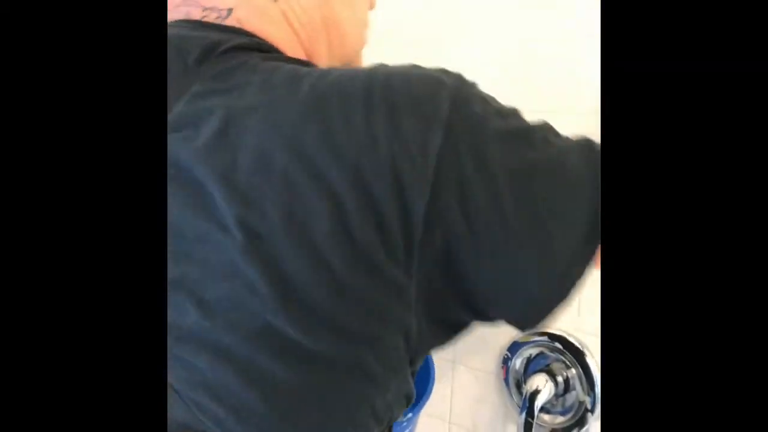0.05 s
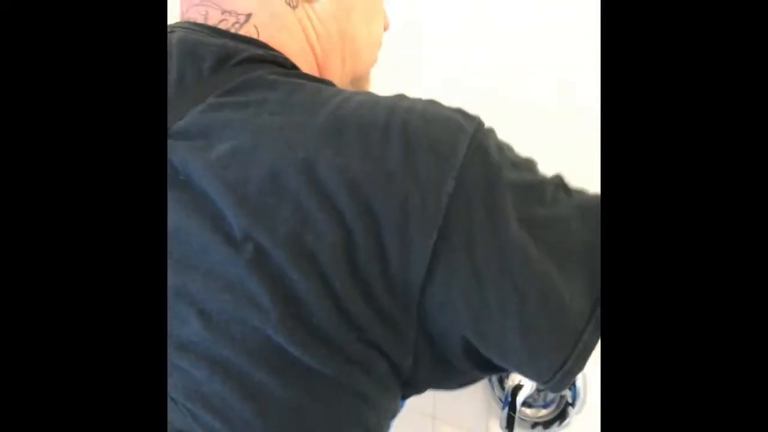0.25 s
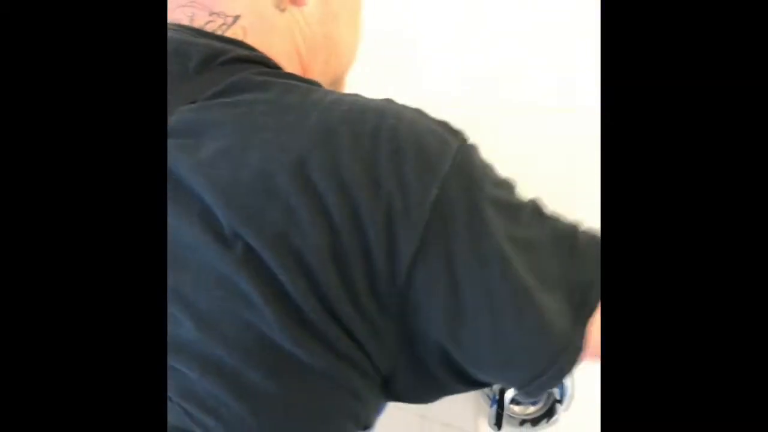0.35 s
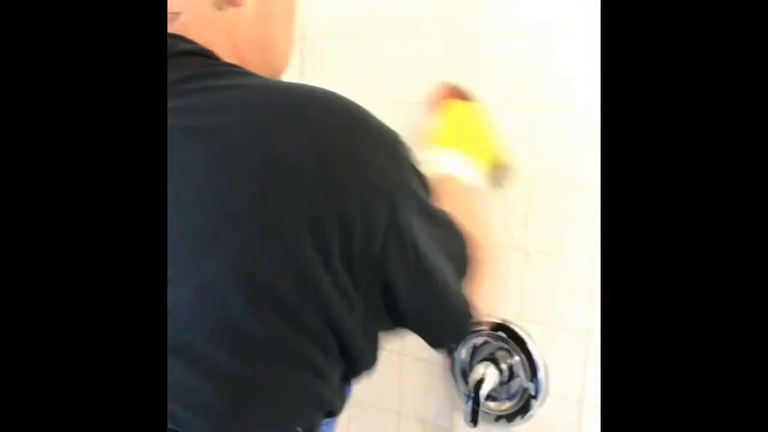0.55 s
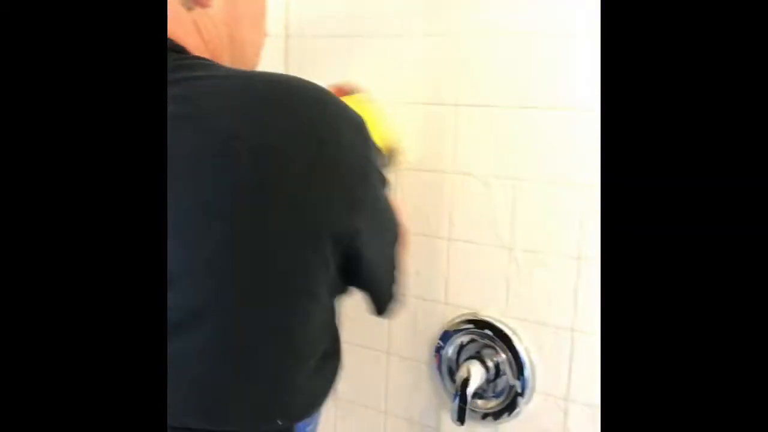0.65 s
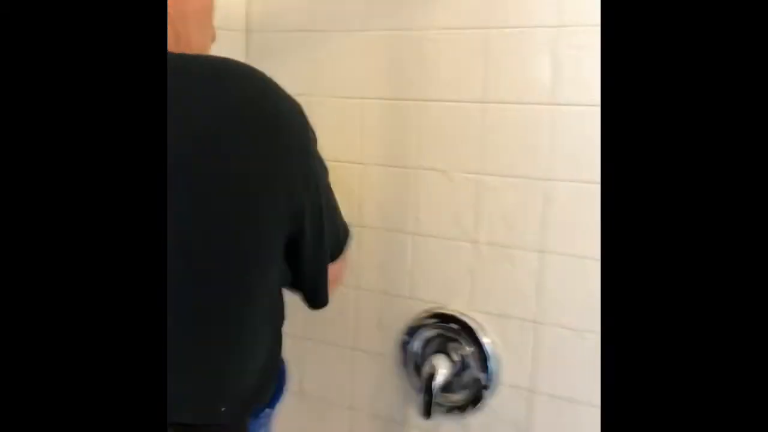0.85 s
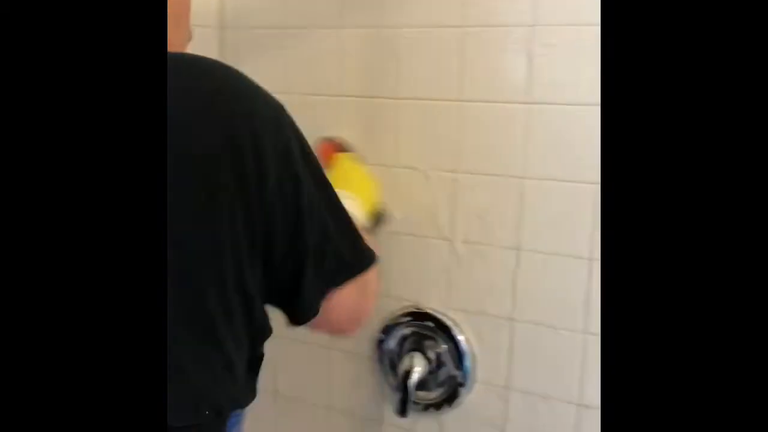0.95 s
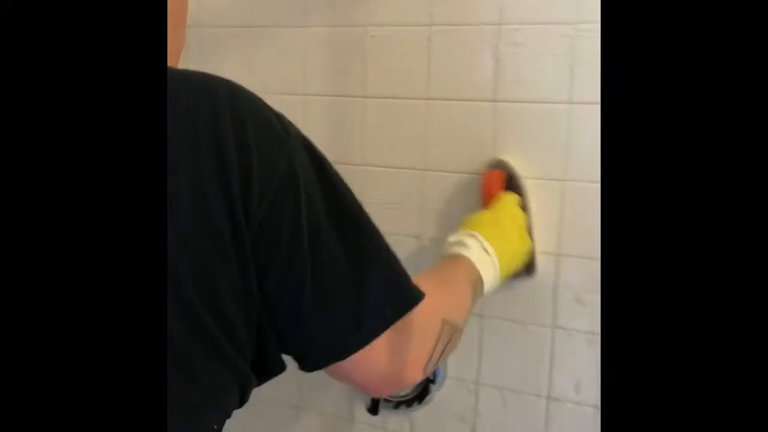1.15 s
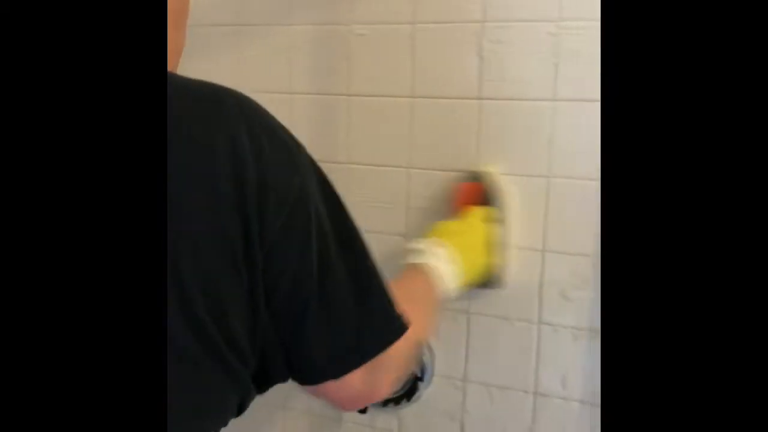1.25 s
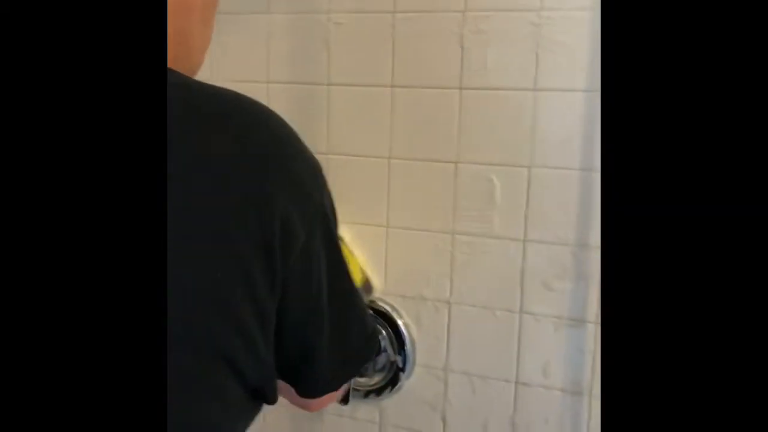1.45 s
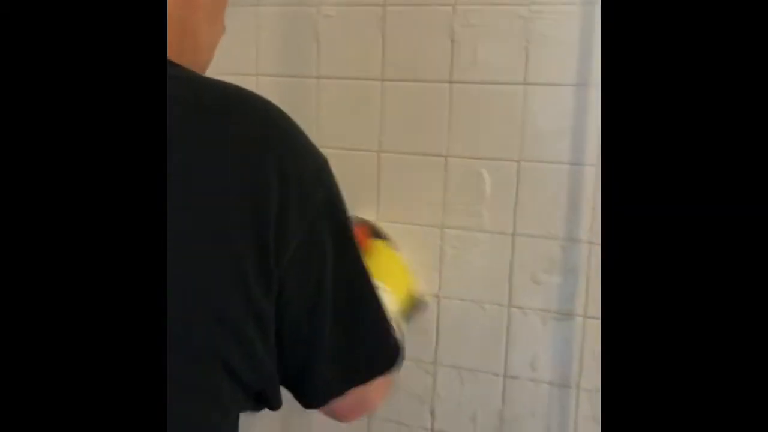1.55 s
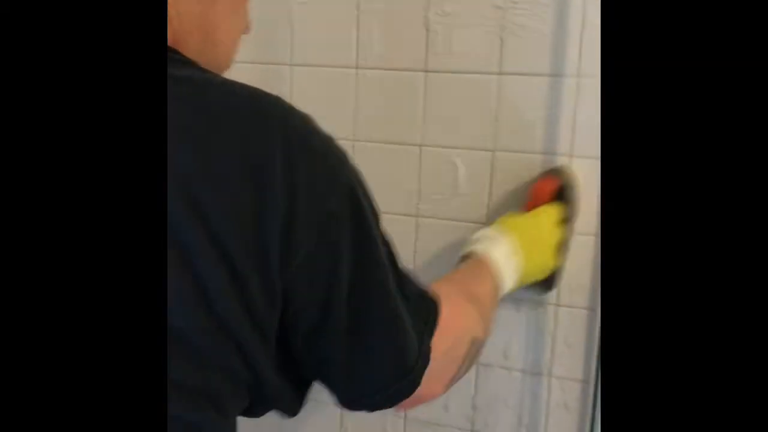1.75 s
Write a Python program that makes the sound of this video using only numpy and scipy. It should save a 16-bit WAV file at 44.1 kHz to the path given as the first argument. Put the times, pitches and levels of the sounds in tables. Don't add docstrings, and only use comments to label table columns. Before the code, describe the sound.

A stiff wet brush scrubs shower tiles with short, bright, scratchy strokes and a duller drag through the wall. At about 0.25 seconds a heavy thump bounces rapidly against the hollow stall, booming and ringing as the recording level dips. From about 0.45 seconds scrubbing returns in uneven strokes until the end, around 1.8 seconds, with soft wall knocks, small-room echo and faint low rumble.

```python
import sys
import numpy as np
from scipy import signal
from scipy.io import wavfile
from scipy.ndimage import uniform_filter1d, minimum_filter1d

SR = 44100
rng = np.random.default_rng(int(sys.argv[2]) if len(sys.argv) > 2 else 0)


def digitize_waveform(pressure):
    field = np.atleast_2d(pressure).T
    bounded = np.clip(field, -1, 1)
    quanta = np.round(bounded * 32767).astype(np.int16)
    wavfile.write(sys.argv[1], SR, quanta)


def voltage_ratio(level):
    return 10 ** (np.asarray(level, float) / 20)


N = 79380
T = np.arange(N) / SR

# f/Hz, level/dB per Hz
RUMBLE_COLOUR = [(25, -38), (40, -24), (56, 6), (80, -5.5), (115, -8), (200, -10.5), (350, -7)]
RUMBLE_DB = -56

# t/s, level/dB
THUMP_CONTACTS = [
    (0.2461, -29),
    (0.2471, -9),
    (0.2544, -10),
    (0.2581, -11.5),
    (.268, -11.5),
    (.279, -13),
    (0.281, -12.5),
    (.288, -14),
    (0.321, -12),
    (.355, -19),
]
# f/Hz, level/dB, time to fall 60 dB/s
STALL_TONES = [(69.6, -12, 0.12), (122.4, -5, 0.2), (159.4, -13, 0.46), (243, -8, 0.21), (284.3, -7, 0.25),
               (336.2, -10, 0.27), (390, -6, 0.16), (526, -16, 0.21), (614, -12, .15), (695.4, -5, .2),
               (733, -9, .2), (1036, -14.5, 0.32), (1418, -13, 0.2), (1498, -10.5, 0.094)]
# f/Hz, level/dB per Hz
BOOM_COLOUR = [(50, -18), (120, -4), (300, -6.5), (600, -4), (1000, -8), (1600, -13), (3000, -24),
               (6000, -59)]
# f/Hz, time to fall 60 dB/s
BOOM_FADE = [(60, 0.33), (250, 0.6), (700, 0.56), (1500, 0.5), (4000, 0.34)]
BOOM_DB, BOOM_RISE_S = -13, 0.0031
CRACK_DB, CRACK_T60_S = -40.5, 0.1
CONTACT_DB, CONTACT_HZ = 4.5, 625

# t/s, peak level/dB, f/Hz, time to fall 60 dB/s
PANEL_HUMS = [(.242, -12.5, 760, 0.13), (.242, -15, 670, .1), (0.27, -17.5, 203, 0.44),
              (.352, -15.5, 197, 0.19), (.414, -27, 200, 0.18), (.457, -36, 202, 0.13),
              (.507, -30, 200, 0.53), (.37, -30.5, 58.6, 0.61), (.43, -36, 58.4, 0.67),
              (.46, -38, 110, 0.32), (0.75, -46, 56, 0.44), (.66, -44.5, 55, 0.66), (1.21, -40, 55.5, .6),
              (1.285, -41, 57, 0.56), (1.74, -40, 64, .5), (1.77, -45, 120, 0.26), (0.15, -40, 160, .2),
              (1.15, -36.5, 271, 0.19), (.59, -36, 1150, 0.4), (.01, -36, 1000, 0.22)]
# t/s, peak level/dB, f/Hz, time to fall 60 dB/s
BRUSH_KNOCKS = [(0.546, -28, 492, 0.062), (.598, -31.5, 329, .15), (.678, -29, 544, 0.037),
                (.676, -38, 730, 0.056), (0.976, -36.5, 109, .15), (1.008, -32, 115, 0.16),
                (1.039, -32, 105, 0.31), (1.07, -36.5, 548, 0.084), (1.095, -31.5, 111, 0.13),
                (1.151, -38, 490, .1), (1.165, -41, 860, 0.14), (1.213, -31.5, 199, 0.095),
                (1.234, -33, 119, 0.068), (1.418, -34, 562.5, 0.3), (1.465, -41, 579, 0.32),
                (1.425, -33.5, 328, 0.15), (1.586, -37, 222, .1), (1.715, -42, 1130, .08),
                (1.772, -36, 726, 0.084), (1.773, -33.5, 170, 0.13), (.11, -35, 294, 0.084),
                (0.028, -38.5, 119, 0.29)]
KNOCK_PUSH_S = 0.0091

# start t/s, length/s, bristle hiss level/dB, wall drag level/dB
BRUSH_STROKES = [(0.0, 0.048, -47, -39.5), (0.044, 0.08, -42, -38), (0.159, 0.04, -46, -39),
                 (0.24, 0.028, -57, -59), (0.42, 0.063, -63, -49.5), (.47, 0.065, -44.5, -45),
                 (0.532, 0.079, -41.5, -41.5), (0.629, 0.055, -43, -41.5), (0.71, .04, -42, -41.5),
                 (0.789, 0.11, -45, -46), (0.981, 0.084, -49, -48), (1.047, 0.1, -51, -44),
                 (1.131, 0.032, -50, -37.5), (1.166, 0.056, -42.5, -43.5), (1.192, 0.023, -43.5, -40),
                 (1.336, 0.037, -49, -47), (1.405, 0.048, -42.5, -43), (1.458, 0.12, -49.5, -54),
                 (1.575, 0.11, -51.5, -50), (1.697, 0.035, -43.5, -40), (1.759, 0.055, -42.5, -41)]
ATTACK_S, RELEASE_DB_PER_S = 0.012, 222
REST_HISS_DB, REST_DRAG_DB = -55.5, -46
FLICKS_PER_S, FLICK_SPREAD_DB = 9000, 2.5
# f/Hz, level/dB per Hz
HISS_COLOUR = [(1500, -19), (3000, 4.5), (5000, -1.5), (7500, -3), (9300, -0.5), (10500, -5.5), (12000, -2),
               (15500, -1)]
# f/Hz, level/dB per Hz
DRAG_COLOUR = [(120, -2), (250, -0.5), (550, -0.5), (750, 0.5), (1150, 0), (2200, -2.5), (4000, -9.5),
               (7000, -12.5)]

ROOM_T60_S, WALL_CUT_HZ, ROOM_DB = 0.38, 7000, -18
DUCK_FROM_DB, DUCK_SHARE = -22, 0.63
DUCK_HOLD_S, DUCK_ATTACK_S, DUCK_BACK_DB_PER_S = 0.17, 0.14, 300
MIC_LOW_HZ, MIC_TOP_HZ = 47, 15720


def rms_one(x):
    return x / np.sqrt(np.mean(x ** 2) + 1e-20)


def at_hz(points, hz):
    known_hz, values = np.array(points)[:, 0], np.array(points)[:, 1]
    return np.interp(np.log(hz), np.log(known_hz), values)


def drift(rate):
    step = 40
    r = np.exp(-2 * step * np.pi * rate / SR)
    noise = rng.standard_normal(N // step + 2002)
    slow = signal.lfilter([1], [1, -2 * r, r * r], noise)[2000:]
    return np.interp(np.arange(N) / step, np.arange(len(slow)), rms_one(slow))


def ring(clicks, hz, t60):
    r = voltage_ratio(-60 / (t60 * SR))
    w = 2 * np.pi * hz / SR
    return signal.lfilter([0, np.sin(w)], [1, -2 * r * np.cos(w), r * r], clicks + 1e-18)


def coloured(sources, spectrum, patchy_db, patch_rate, t60s=None):
    edges = np.geomspace(spectrum[0][0] / 1.3, min(spectrum[-1][0] * 1.15, 17000), 20)
    since = np.maximum(T - THUMP_CONTACTS[0][0], 0)
    out, steady = np.zeros(N), np.zeros(N)
    for k, (low, high) in enumerate(zip(edges, edges[1:])):
        hz = np.sqrt(low * high)
        band_filter = signal.butter(2, [low, high], "band", fs=SR, output="sos")
        band = signal.sosfilt(band_filter, sources[k % 2])
        band = band * voltage_ratio(at_hz(spectrum, hz) + patchy_db * drift(patch_rate))
        steady += band
        if t60s is not None:
            band = band * voltage_ratio(-60 * since / at_hz(t60s, hz))
        out += band
    return out / np.sqrt(np.mean(steady ** 2))


def rumble():
    noise = rng.standard_normal((2, N))
    return voltage_ratio(RUMBLE_DB) * coloured(noise, RUMBLE_COLOUR, patchy_db=5.7, patch_rate=4.3)


def stall_echo(x):
    out, dull = np.zeros(N), np.exp(-2 * np.pi * WALL_CUT_HZ / SR)
    lags = (rng.uniform(0.008, 0.03, size=10) * SR).astype(int)
    for k, lag in enumerate(lags):
        loop, state = x.copy(), [0.]
        gain = voltage_ratio(-60 * lag / SR / ROOM_T60_S)
        for i in range(lag, N, lag):
            back, state = signal.lfilter([gain * (1 - dull)], [1, -dull], loop[i - lag:i], zi=state)
            loop[i:i + lag] += back[:N - i]
        out += (loop - x) * (-1) ** k
    return out


def thump():
    s, db = np.transpose(THUMP_CONTACTS)
    at = (s * SR).astype(int)
    chance_db = rng.normal(0, 4, (len(s), len(STALL_TONES)))
    signs = rng.choice([-1, 1], chance_db.shape)
    out = np.zeros(N)
    for k, (hz, level_db, t60) in enumerate(STALL_TONES):
        clicks = np.zeros(N)
        clicks[at] = signs[:, k] * voltage_ratio(db + level_db - 8 + chance_db[:, k])
        out += ring(clicks, hz, t60)

    clicks = np.zeros(N)
    clicks[at] = signs[:, 0] * voltage_ratio(db + CONTACT_DB)
    out += ring(clicks, CONTACT_HZ, 2.3 / CONTACT_HZ)

    since = np.maximum(T - s[0], 0)
    rise = 1 - np.exp(-since / BOOM_RISE_S)
    noise = rng.standard_normal((2, N))
    boom = voltage_ratio(BOOM_DB) * coloured(noise, BOOM_COLOUR, patchy_db=-0.5, patch_rate=16, t60s=BOOM_FADE)
    bright = signal.lfilter([1, -0.8], [1], rng.standard_normal(N))
    crack = voltage_ratio(CRACK_DB - 60 * since / CRACK_T60_S) * bright
    return out + rise * (boom + crack)


def knocks():
    events = [*BRUSH_KNOCKS, *PANEL_HUMS]
    out, size = np.zeros(N), int(KNOCK_PUSH_S * SR)
    for s, db, hz, t60 in events:
        shape = rng.standard_normal(size) * np.hanning(size)
        tuned = abs(np.sum(shape * np.exp(-2j * np.pi * hz * np.arange(size) / SR)))
        strength = tuned + 0.3 * np.sqrt(np.sum(shape ** 2))
        start = int(s * SR)
        push = np.zeros(N + size)
        push[start:start + size] = voltage_ratio(db) * shape / strength
        out += ring(push[:N], hz, t60)
    return signal.sosfilt(signal.butter(2, 2000, fs=SR, output="sos"), out)


def pressure(column, rest_db):
    power = voltage_ratio(2 * rest_db) * np.ones(N)
    for row in BRUSH_STROKES:
        start, length = row[0], row[1]
        rise = np.clip((T - start) / ATTACK_S, 0, 1) ** 2
        fall_db = RELEASE_DB_PER_S * np.maximum(T - start - length, 0)
        power += rise * voltage_ratio(2 * (row[column] - fall_db))
    return np.sqrt(power)


def brush():
    sizes = voltage_ratio(FLICK_SPREAD_DB * np.minimum(rng.exponential(1, (4, N)), 5))
    signs = rng.choice([-1, 1], (4, N))
    flicks = sizes * signs * (rng.random((4, N)) < FLICKS_PER_S / SR)
    flutter = voltage_ratio(0.75 * drift(20))
    hiss = coloured(flicks[:2], HISS_COLOUR, patchy_db=0.3, patch_rate=15)
    drag = coloured(flicks[2:], DRAG_COLOUR, patchy_db=2.0, patch_rate=25.5)
    hiss = hiss * pressure(column=2, rest_db=REST_HISS_DB)
    drag = drag * pressure(column=3, rest_db=REST_DRAG_DB)
    return flutter * (hiss + drag)


def scene():
    near = brush() + knocks()
    echo = voltage_ratio(ROOM_DB) * stall_echo(near)
    return (rumble() + echo + thump() + near)[None]


def roll_off(x):
    return signal.sosfilt(signal.butter(12, 17050, fs=SR, output="sos"), x)


def record(dry):
    level_db = 10 * np.log10(uniform_filter1d(dry[0] ** 2, size=800) + 1e-12)
    over = DUCK_SHARE * np.maximum(level_db - DUCK_FROM_DB, 0)
    hold = int(DUCK_HOLD_S * SR)
    held = -minimum_filter1d(-np.r_[np.zeros(hold), over], hold, origin=-(hold // 2))[:N]
    back_db = DUCK_BACK_DB_PER_S * T
    held = np.maximum.accumulate(held + back_db) - back_db
    r = np.exp(-1 / (DUCK_ATTACK_S * SR))
    duck_db = np.minimum(held, signal.lfilter([1 - r], [1, -r], held))
    x = dry * voltage_ratio(-duck_db)
    x = signal.sosfilt(signal.ellip(14, 0.5, 75, MIC_TOP_HZ, fs=SR, output="sos"), x)
    x = signal.sosfilt(signal.butter(4, MIC_LOW_HZ, "high", fs=SR, output="sos"), x)
    return roll_off(x)


dry = scene()
out = record(dry)
digitize_waveform(out)
```